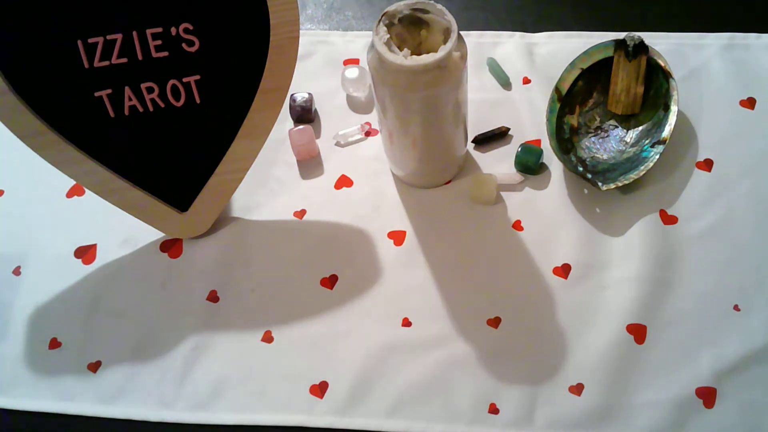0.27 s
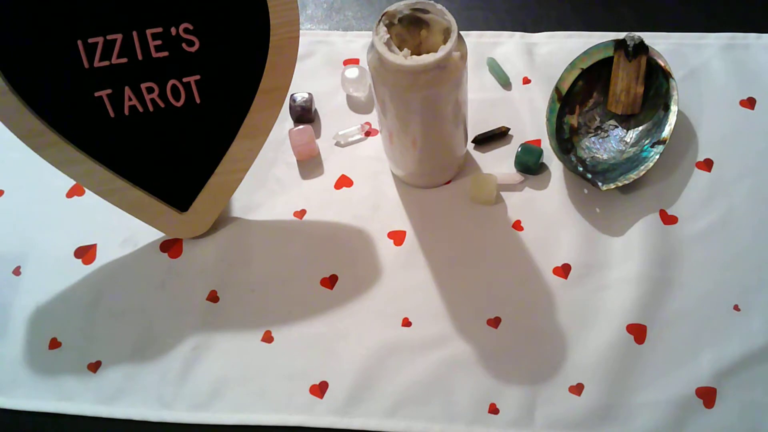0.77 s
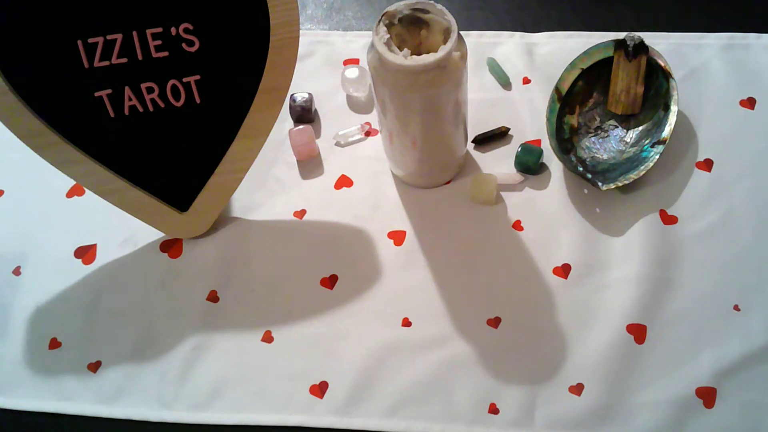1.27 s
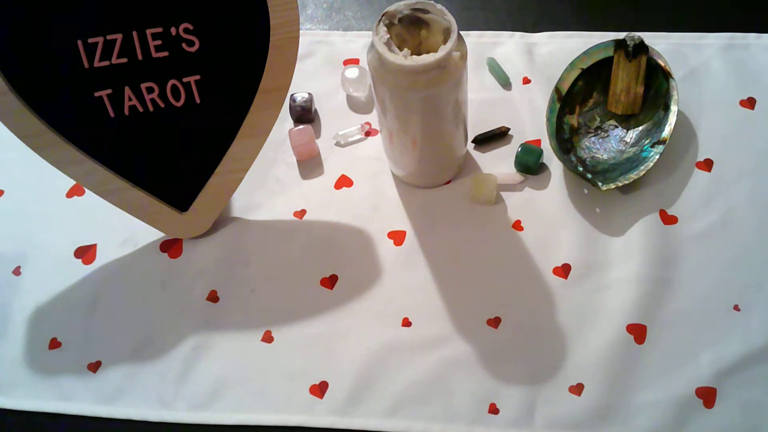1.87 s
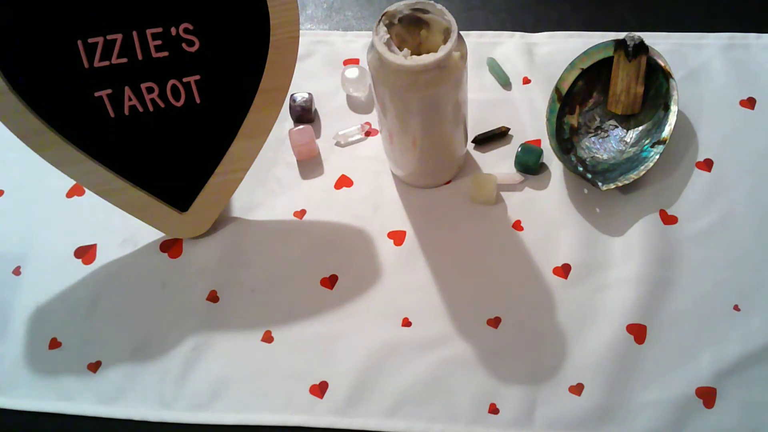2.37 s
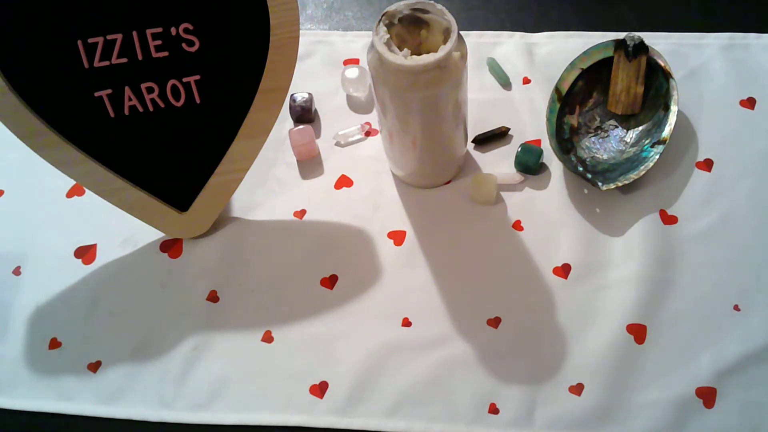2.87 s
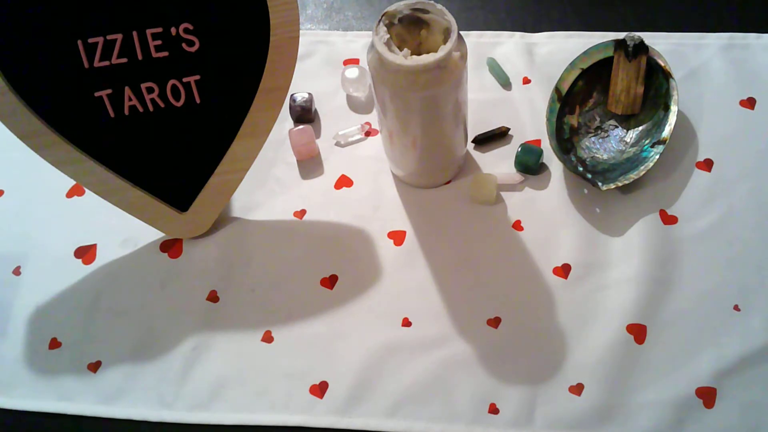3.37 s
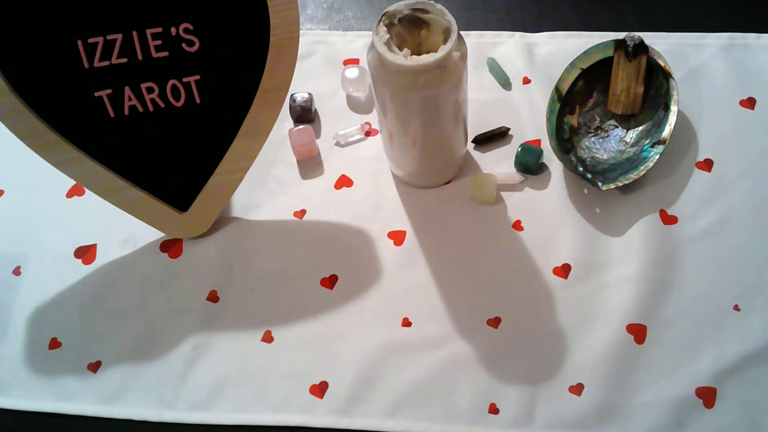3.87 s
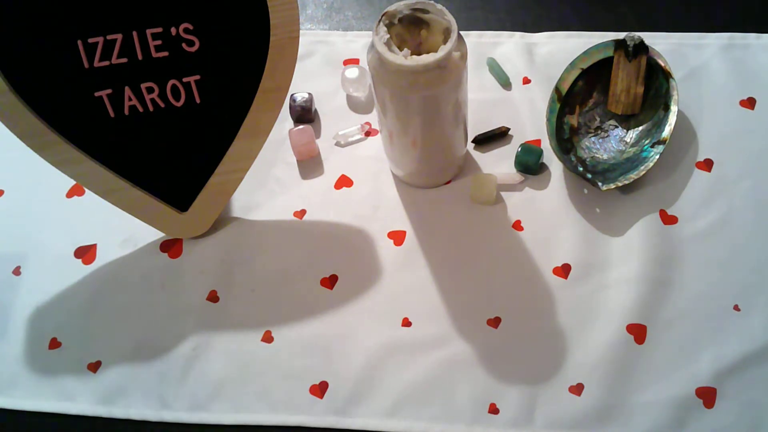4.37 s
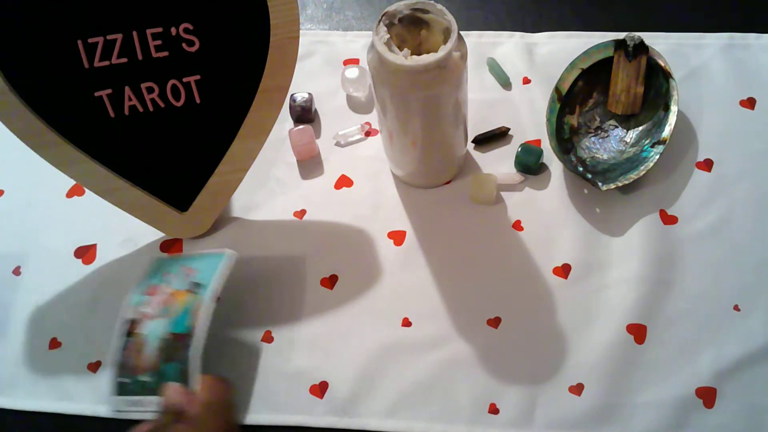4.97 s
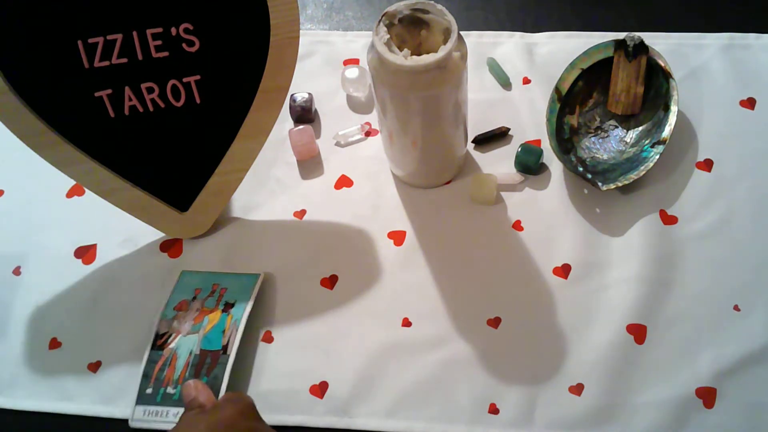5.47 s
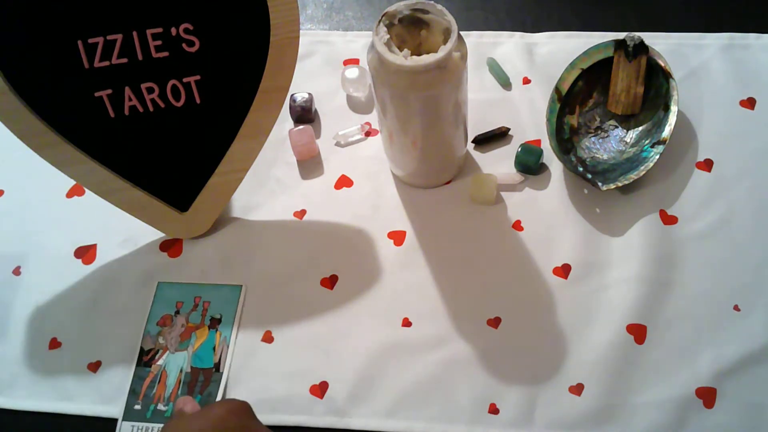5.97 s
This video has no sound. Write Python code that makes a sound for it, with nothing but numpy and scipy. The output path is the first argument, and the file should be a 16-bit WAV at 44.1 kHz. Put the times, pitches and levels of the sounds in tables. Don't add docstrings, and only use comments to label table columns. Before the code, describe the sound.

In a small quiet room, steady faint hush underlies fingers rubbing stiff cards. Light edge ticks lead to a loud crackling snap with a dull table knock around two seconds. More papery rubbing follows, then sharp flicks around four and nearly six seconds, and a cushioned landing just after. A small close microphone gives a bright, band-limited sound.

```python
import sys
import numpy as np
from scipy import signal
from scipy.fft import rfft, irfft
from scipy.io import wavfile
from scipy.ndimage import uniform_filter1d

SR = 44100
rng = np.random.default_rng(int(sys.argv[2]) if len(sys.argv) > 2 else 0)


def volts(x):
    e = np.asarray(x, float) / 20
    return 10 ** e


def output_pcm(signal):
    pcm = np.clip(np.atleast_2d(signal).T, -1, 1) * 32767
    wavfile.write(sys.argv[1], SR, np.round(pcm).astype(np.int16))


N = 274125

# pitch_hz, level_db (per Hz)
HUSH_COLOUR = [(12, -41), (20, -8), (60, -3), (136, 0.5), (285, -5.5), (440, -10), (771, -15), (922, -16),
               (1190, -17.5), (2630, -23), (4850, -37.5), (5650, -37), (6930, -32), (7480, -32),
               (8950, -42), (11600, -78), (19700, -120)]
# full_pressure_s, rise_s, fall_s, level_db
RUB_STROKES = [(0.07, 0.022, 0.085, -69), (0.412, 0.19, 0.083, -60.5), (0.578, 0.082, .07, -65),
               (0.866, 0.1, 0.1, -55.5), (1.128, 0.094, 0.19, -63.5), (1.592, 0.34, 0.11, -65.5),
               (1.8, 0.092, 0.22, -60.5), (1.9, 0.075, 0.051, -71), (2.2, .35, 0.29, -64.5),
               (2.3, 0.031, 0.27, -62.5), (2.514, 0.013, 0.054, -67), (2.6, 0.05, 1, -64),
               (3.072, 0.14, 0.042, -60), (3.252, 0.031, 0.044, -60.5), (3.382, 0.014, 0.08, -64.5),
               (3.558, 0.055, 0.56, -70.5), (3.784, .06, 0.028, -66), (4.0, 0.031, 0.077, -51),
               (4.198, 0.11, 0.078, -54.5), (4.44, 0.54, 0.041, -68), (4.586, 0.16, 0.057, -58.5),
               (4.8, 0.26, 0.57, -73.5), (5.002, 0.063, 0.44, -69), (5.196, .15, 0.049, -64.5),
               (5.322, 0.12, 0.073, -62), (5.472, 0.025, 0.4, -67.5), (5.576, 0.062, 0.083, -65.5),
               (5.91, .1, 0.057, -66), (6.057, 0.067, 0.033, -58.5), (6.125, .05, 1, -68.5)]
# start_s, edge_crack_db, table_thump_db, card_body_db, card_top_db
SMALL_SNAPS = [(0.0652, -48, -58, -61, -73), (0.565, -45, -48, -50, -72), (0.787, -60, -47.5, -51, -71),
               (1.7658, -40, -50, -66, -69), (1.845, -28.5, -50, -61, -52), (1.858, -31.5, -66, -65, -72),
               (2.0266, -33, -56, -49, -58), (2.289, -55, -66.5, -60, -68), (2.5901, -45, -46, -46.5, -68),
               (3.248, -62, -62, -51.5, -70), (4.029, -32, -64, -72, -60), (4.143, -34, -58, -65, -67),
               (4.1713, -55, -51, -47, -64), (5.033, -66, -47, -53, -55), (5.1011, -66, -52, -60, -70),
               (5.467, -56, -66, -64, -65), (5.7328, -21, -71, -71, -58.5), (5.8555, -61, -79, -69, -62),
               (5.8972, -58, -69, -58, -60)]
# start_s, edge_crack_db, table_thump_db, card_body_db, contact_ms
FIRM_SNAPS = [(1.8205, -46, -57, -44, 3.7), (1.8334, -46, -42, -32, 1.03), (2.0391, -33, -53, -33, 1.7),
              (2.0455, -31, -34, -42.5, 4.5), (2.0606, -12.5, -29.5, -19.5, 2),
              (2.0630, -20.5, -24.5, -16.5, 1.8), (2.0678, -21.5, -32.5, -35, 4.2),
              (2.0766, -22, -48, -38, 2.5), (4.0176, -23.5, -32, -49, 3), (5.6886, -33, -58, -63, 1.07),
              (5.6895, -14.5, -41.5, -42, 6), (5.6913, -17.5, -41, -42, 1.2),
              (5.6990, -13.5, -53, -44.5, 5), (5.711, -30, -60, -63, 0.9), (6.0644, -25.5, -20.5, -38, 1.2),
              (6.078, -38, -54, -48, 1.1), (6.089, -61, -52, -71, 2.1)]
# middle_s, length_s, level_db, pitch_hz, width_hz
EDGE_DRAGS = [(0.866, 0.075, -69, 2350, 2000), (1.777, 0.028, -62, 2180, 2500),
              (1.847, 0.049, -56, 1450, 2050), (2.06, 0.04, -55, 1770, 2500),
              (2.0635, 0.0039, -32, 7400, 1000), (2.075, 0.018, -40.5, 7250, 800),
              (2.298, 0.028, -58, 1490, 2500), (2.597, 0.035, -59.5, 1480, 3000),
              (4.018, 0.046, -56, 1200, 1970), (4.022, 0.018, -58, 4840, 890),
              (4.15, 0.033, -65, 2240, 1500), (4.19, 0.023, -53, 1750, 1100), (4.18, 0.014, -58, 2550, 500),
              (4.58, 0.062, -69.5, 3750, 800), (5.055, 0.039, -64.5, 2080, 1500),
              (5.3, 0.088, -68.5, 3000, 3000), (5.48, .04, -69, 2800, 2500),
              (5.574, 0.064, -65, 2500, 1490), (5.693, 0.0063, -45.5, 2230, 1000),
              (6.068, 0.014, -44.5, 7330, 2000), (6.072, .016, -42, 577, 400), (6.11, .025, -50, 250, 200),
              (6.0665, 0.004, -52, 2180, 1620)]
# middle_s, length_s, level_db, pitch_hz
CORNER_CATCHES = [(0.068, 0.0037, -57, 886), (1.825, .008, -49, 1060), (1.836, 0.0034, -48.5, 3000),
                  (2.064, 0.005, -28.5, 1050), (2.067, 0.013, -41.5, 402), (5.0335, .002, -54, 2180),
                  (2.6, 0.02, -57, 600), (4.002, 0.039, -56.5, 3200), (4.578, 0.028, -61, 1410),
                  (5.1025, 0.003, -50, 1320), (4.02, .006, -41, 330), (5.7025, .005, -35.5, 6770),
                  (5.701, 0.01, -45, 1060), (6.068, 0.007, -43, 1820), (6.149, 0.027, -63, 1920)]
# pitch_hz, level_db, fade_by_60_db_s
PORT_TONES = [(5800, -5.5, 0.0039), (6040, -5, 0.0062), (6790, -1.5, 0.0043), (7290, -8, 0.015),
              (7270, -7, 0.0047), (8880, -4, 0.0079)]
# pitch_hz, level_db, fade_by_60_db_s
CARD_TONES = [(515, 0.5, 0.012), (746, -2.5, 0.015), (1060, 4, 0.0063), (1266, -3, 0.0091),
              (1593, -1, 0.01), (1820, 1, 0.013), (2037, -2.5, 0.0095), (2350, -2.5, .01),
              (2620, -1, 0.0087), (2876, -9.5, 0.013)]
# pitch_hz, level_db, fade_by_60_db_s
CARD_TOP_TONES = [(2900, 0.28, 0.0067), (3420, 2.2, 0.0049), (3680, 0.31, 0.0094), (4470, 0.11, 0.0066),
                  (5080, -0.65, 0.014), (5340, -0.29, 0.0041)]
# pitch_hz, level_db, fade_by_60_db_s
TABLE_TONES = [(165, -18, 0.088), (223, -9.5, 0.092), (238.7, -3, 0.072), (297, 0, 0.076), (336, -2, 0.033),
               (378.4, 0, 0.05), (455, -6, 0.051), (500, -5, 0.091), (583, -1.5, 0.038), (648, -11.5, 0.18)]


def level(x, db):
    return x * volts(db) / np.sqrt(np.mean(x ** 2))


def band(x, hz, width_hz):
    edges = [max(hz - width_hz / 2, hz / 4), hz + width_hz / 2]
    return signal.sosfilt(signal.butter(2, edges, "band", fs=SR, output="sos"), x)


def ring(force, tones, step=-1):
    out, power = 0, 0
    for k, (hz, db, t60) in enumerate(tones):
        r = np.exp(-np.log(1000) / (t60 * SR))
        w = 2 * np.pi * hz / SR
        top = [np.sin(w), 0, -np.sin(w)]
        bottom = [1, -2 * r * np.cos(w), r * r]
        tone = signal.lfilter(top, bottom, force) / (2 * np.sin(w))
        out = out + step ** k * volts(db) * tone
        power += volts(db) ** 2 / (4 * (1 - r))
    return out / np.sqrt(power)


def walk(rate_hz):
    hold = int(SR / rate_hz)
    steps = np.repeat(rng.standard_normal(N // hold + 1), hold)
    return 0.86 * uniform_filter1d(uniform_filter1d(steps, hold), hold)[:N]


def grit(rough_db, rate_hz):
    return level(rng.standard_normal(N) * volts(rough_db * walk(rate_hz)), 0)


def hush():
    hz, db = np.transpose(HUSH_COLOUR)
    f = np.fft.rfftfreq(N, 1 / SR)
    colour = volts(np.interp(np.log(f + 1), np.log(hz), db))
    noise = irfft(rfft(rng.standard_normal(N)) * colour, N)
    return level(noise, -58) * volts(0.4 * walk(6))


def rubbing():
    t = np.arange(N) / SR
    swing_db = 20
    pressure = np.zeros(N)
    for s, rise, fall, db in RUB_STROKES:
        distance = np.maximum((s - t) / rise, (t - s) / fall)
        pressure += volts(db - swing_db * distance)
    fine = ring(grit(2.5, 120), PORT_TONES)
    coarse = volts(-8.5) * level(band(grit(1.8, 150), 2500, 2900), 0)
    return pressure * (fine + coarse)


def snaps():
    card, push = np.zeros((2, N + SR))
    t = np.arange(SR // 4) / SR
    echo_t60_s, echo_db = 0.27, -6
    echo = (1 - np.exp(-t / 0.0018)) * volts(-60 * t / echo_t60_s)
    echo /= np.sqrt(np.sum(echo ** 2))

    small_contact_ms = 1.77
    rows = [(*row, small_contact_ms) for row in SMALL_SNAPS]
    for s, crack_db, thump_db, body_db, ms in FIRM_SNAPS:
        top_db = 0.65 * crack_db + 0.35 * body_db - 9.5
        rows.append((s, crack_db, thump_db, body_db, top_db, ms))

    for s, crack_db, thump_db, body_db, top_db, ms in rows:
        noise = rng.standard_normal((4, len(t)))
        at = slice(int(s * SR), int(s * SR) + len(t))
        shape = np.exp(-t / (ms / 1000))
        size = np.sqrt(np.sum(shape ** 2))
        force = noise[:3] * (shape + volts(echo_db) * echo * size)
        force[:, 0] = 0.89 * size
        bends = 1 + 0.04 * rng.standard_normal(len(CARD_TONES))
        bent = [(hz * bend, db, t60) for (hz, db, t60), bend in zip(CARD_TONES, bends)]
        parts = [(PORT_TONES, crack_db - 11), (bent, body_db), (CARD_TOP_TONES, top_db - 3.5)]
        for part, (tones, db) in zip(force, parts):
            card[at] += level(ring(part, tones), db) * np.sqrt(np.mean(shape ** 2))
        pulse = t / 0.00035 * np.exp(1 - t / 0.00025)
        settling = 0.28 * noise[3] * np.exp(-t / 0.011)
        push[at] += volts(thump_db) * (pulse + settling)
    thump = band(ring(push, TABLE_TONES, step=0.85), 543, 730)
    return card[:N], volts(-5.0) * thump[:N]


def scrapes():
    out, force = np.zeros(N), grit(3.0, 200)
    catch_width_hz = 380
    rows = list(EDGE_DRAGS) + [(*row, catch_width_hz) for row in CORNER_CATCHES]
    for s, length, db, hz, width_hz in rows:
        n = int(2 * length * SR)
        start = int(s * SR) - n // 2
        at = slice(start, start + n)
        out[at] += level(band(force[at], hz, width_hz), db) * np.hanning(n) ** 0.79
    return out


def room(x):
    low_t60_s, top_t60_s, room_db = 0.3, 0.33, -10
    t = np.arange(SR // 2) / SR
    noise = rng.standard_normal(len(t))
    low = signal.sosfilt(signal.butter(2, 4500, fs=SR, output="sos"), noise)
    treble = volts(3.0) * (noise - low)
    tail = low * volts(-60 * t / low_t60_s) + treble * volts(-60 * t / top_t60_s)
    tail *= 1 - np.exp(-(t / 0.0036) ** 2)
    spectrum = rfft(tail)
    colour = np.sqrt(uniform_filter1d(np.abs(spectrum) ** 2, size=60))
    tail = irfft(spectrum / colour, len(t))
    tail /= np.sqrt(np.sum(tail ** 2))
    return signal.fftconvolve(x, tail)[:N] * volts(room_db)


def scene():
    steady = hush()
    rubs = rubbing()
    card, thump = snaps()
    dull = thump + scrapes()
    return (card + dull + room(dull) + rubs + steady)[None]


def band_limit(x):
    return signal.sosfilt(signal.butter(12, 9100, fs=SR, output="sos"), x)


def record(dry):
    top_hz = 9640
    cut = signal.sosfilt(signal.cheby2(14, 85, top_hz, fs=SR, output="sos"), dry)
    return band_limit(cut)


dry = scene()
out = record(dry)
output_pcm(out)
```